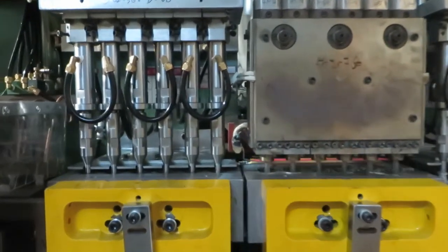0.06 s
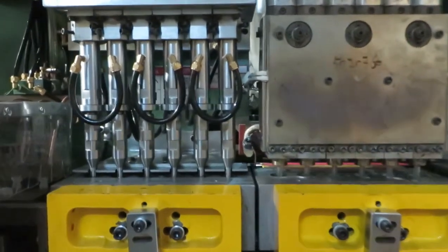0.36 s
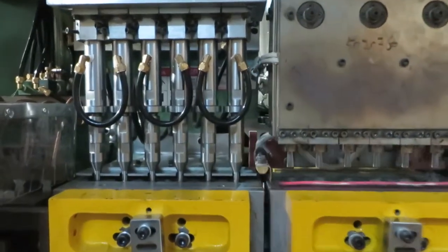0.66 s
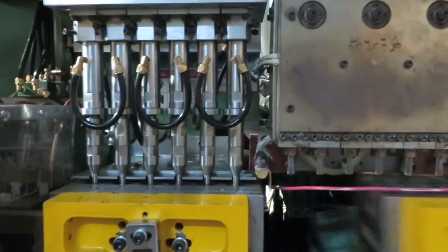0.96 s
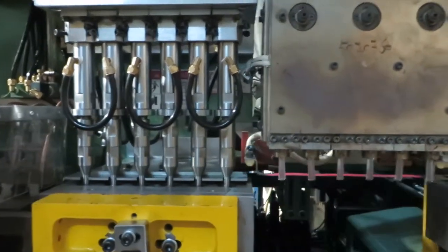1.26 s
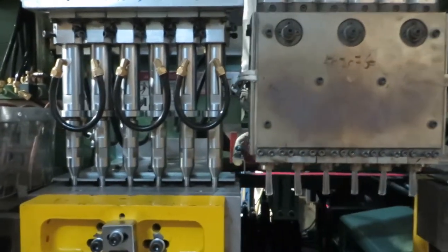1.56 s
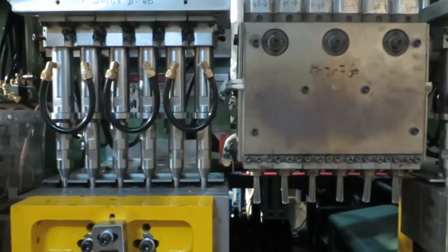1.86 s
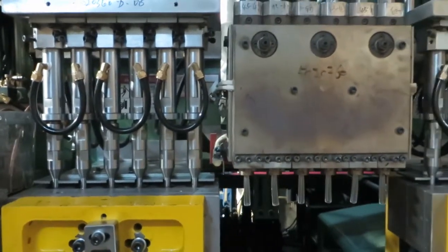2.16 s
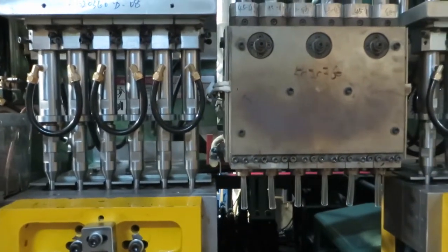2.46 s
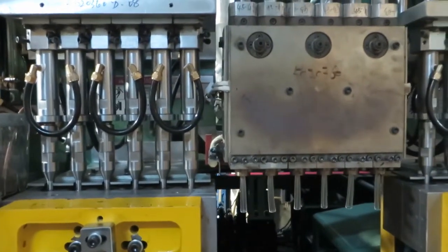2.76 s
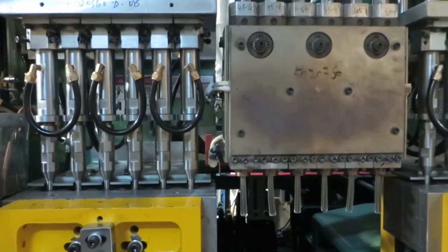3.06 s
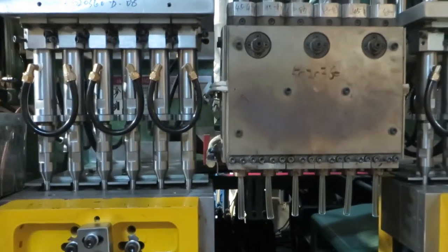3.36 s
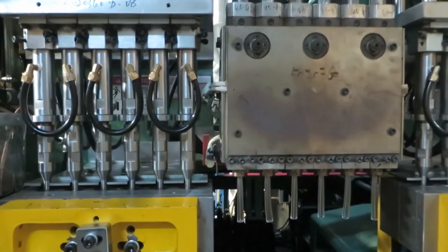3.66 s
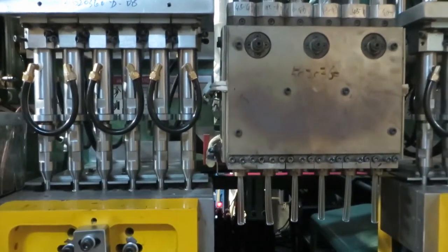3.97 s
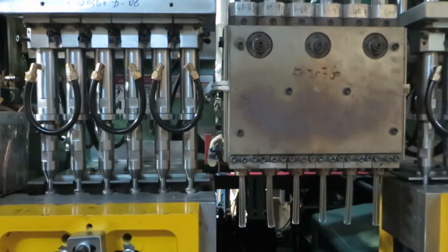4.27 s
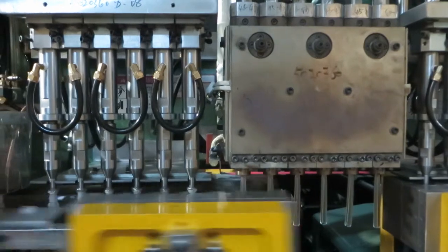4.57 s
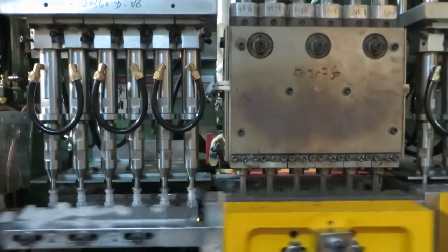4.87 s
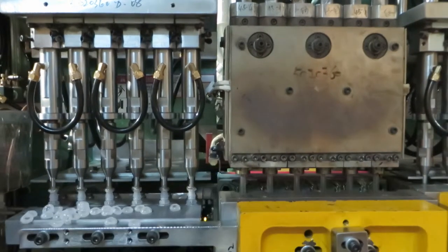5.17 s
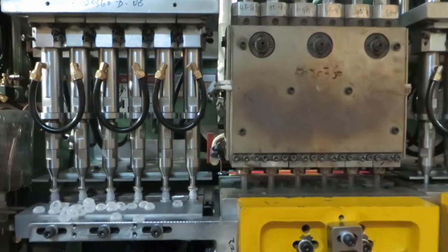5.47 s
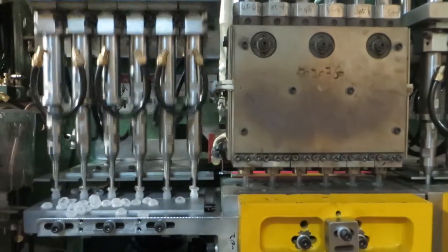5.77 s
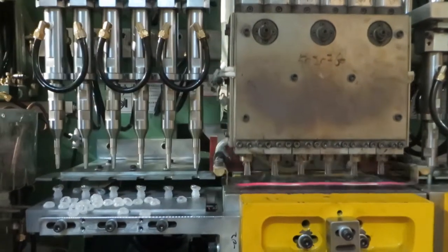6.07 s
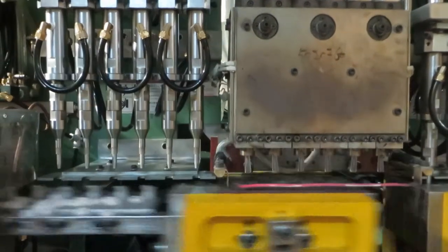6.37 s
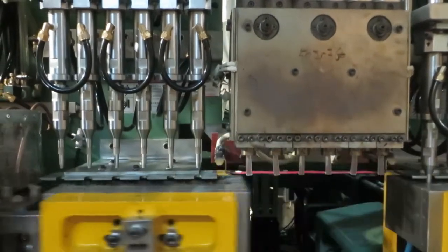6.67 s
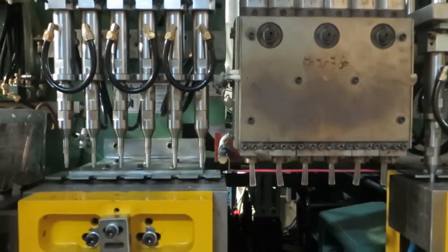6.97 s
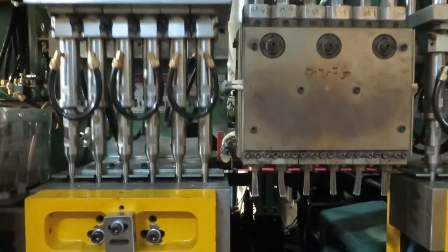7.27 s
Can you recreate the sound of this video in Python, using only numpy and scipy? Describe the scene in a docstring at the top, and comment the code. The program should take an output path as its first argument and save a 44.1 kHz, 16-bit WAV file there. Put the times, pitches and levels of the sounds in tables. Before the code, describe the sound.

An industrial moulding machine hisses steadily with air and oil, with valve puffs, clunks, a thin whistle and one ringing clang.

```python
"""Plastic blow moulding machine

One cycle, heard from close by in a factory. Air hisses through the blow pins into the moulds and
oil rushes through the pipes. On the left, a leak hisses and whistles as the air line fills.
Valves puff and squeal, the mould carriage rumbles, clunks and knocks against its stops,
and two quick blows on the steel frame make one ringing clang."""
import sys
import numpy as np
from scipy import signal
from scipy.fft import rfft, irfft, next_fast_len
from scipy.io import wavfile

SR = 44100
rng = np.random.default_rng(int(sys.argv[2]) if len(sys.argv) > 2 else 0)


def file_out(sig):
    """Save sig as 16-bit WAV at sys.argv[1]."""
    # one column per channel
    cols = np.atleast_2d(sig).T
    # limit, then scale
    lim = np.clip(cols, -1, 1)
    pcm = np.round(lim * 32767).astype(np.int16)
    wavfile.write(sys.argv[1], SR, pcm)


N = 327663
T = np.arange(N) / SR
FFT_SIZE = next_fast_len(N, real=True)
HZ = np.maximum(np.arange(FFT_SIZE // 2 + 1) * SR / FFT_SIZE, 1)

# Below, t is the start time, f is frequency, and t60 is the time a sound takes to fade by 60 dB.
# hiss of air blown into the moulds: f/Hz, level/dB
BLOW_SPECTRUM = [(2000, -104), (4500, -74.5), (5900, -64.5), (7200, -69), (8000, -64.5), (9000, -57.5),
                 (9800, -54), (10700, -53), (11700, -57.5), (12200, -54), (12900, -70), (14200, -77)]
# resonances (boosted or weakened pitches) of the blow pins: f/Hz, width/Hz, boost/dB
PIN_PEAKS = [(6230, 69, 9), (8620, 240, 5.5), (9100, 240, -9.5), (9340, 110, 4.5), (10150, 200, -1),
             (10800, 82, -6), (11900, 220, 0.5), (12300, 170, -1), (12770, 120, 7)]
# spells of blowing: t/s, level/dB, hold/s, left minus right/dB
BLOW_SPELLS = [(0, 1.97, 1.58, -2.7), (1.85, 0, 1.11, -1)]
# rush of oil in valves and pipes: f/Hz, level/dB
OIL_SPECTRUM = [(25, -110), (100, -90.5), (160, -87), (300, -84.5), (600, -77), (1000, -72.5), (1400, -71),
                (2000, -66.5), (2900, -62), (4000, -66.5), (5000, -68), (6000, -65.5), (7300, -72.5),
                (13000, -73)]
# resonances of the main oil line: f/Hz, width/Hz, boost/dB
MAIN_PEAKS = [(605.5, 10.4, 14.5), (1036, 67, 2), (1708, 99, 8), (1900, 92, -1), (2091, 70, 10),
              (2274, 33, 9.5), (2410, 110, 0.5), (2708, 54, 8.5), (2860, 63, 3.5), (3460, 130, 5),
              (4230, 160, 6)]
# resonances of the return oil line: f/Hz, width/Hz, boost/dB
RETURN_PEAKS = [(579, 9.9, 18.5), (1030, 81, 12.5), (1292, 26, 10), (1602, 89, 9.5), (1926, 68, 5),
                (2600, 76, 4.5), (2870, 180, -2.5), (3293, 220, 7.5), (3646, 61, 8), (3840, 140, 4.5),
                (4345, 110, 13), (4770, 150, -1), (5300, 120, 8.5)]
# strokes fed by the main line: t/s, flow/dB, rise/s, hold/s, t60/s
OIL_STROKES = [(0, 0.74, 0.0033, 1.01, 12), (1.2, -1.07, 0.088, 2.5, 5), (5.9, 4.5, 0.73, .58, 1.8)]
# oil draining through the return line: t/s, flow/dB, rise/s, hold/s, t60/s
OIL_DRAINS = [(2.6, 0.64, 2.49, 1.4, 2.6)]
# hiss of air let out by the valves: f/Hz, level/dB
EXHAUST_SPECTRUM = [(150, -89), (600, -65), (2000, -62.5), (4200, -57.5), (5400, -53), (6800, -55.5),
                    (8600, -51.5), (10000, -55), (11600, -59.5), (12800, -67.5), (14200, -69)]
# puffs from the valves: t/s, level/dB, rise/s, hold/s, t60/s, treble tilt/(dB per octave)
PUFFS = [(1.594, 2, 0.025, 0.037, 1, 0), (1.697, -14, .02, 0.11, 0.12, 1),
         (2.967, -5, .006, 0.022, 0.086, -3), (3.054, -12, .012, .025, 0.2, 7),
         (3.272, -16, .01, .03, .15, 11.5), (3.408, -8, .005, .006, 0.068, 7),
         (5.344, -7.5, 0.013, .015, 0.35, 10), (7.173, 1, 0.028, 0.036, 0.77, 1)]
# hiss of the leaking air line: f/Hz, level/dB
LEAK_SPECTRUM = [(200, -99), (700, -72.5), (1400, -78), (2400, -81), (4000, -64.5), (5300, -65.5),
                 (6250, -57), (6900, -66.5), (8400, -61), (10000, -62), (11900, -66.5), (12700, -97),
                 (14200, -124)]
# resonances of the leak: f/Hz, width/Hz, boost/dB
LEAK_RESONANCES = [(5040, 25, 3), (5290, 130, 4.5), (6060, 240, 4), (8520, 280, 3.5), (9100, 140, -3.5),
                   (9400, 150, 2.5), (11400, 1500, 2)]
# cylinders drawing air from the line: t/s, drop in whistle pitch/Hz, recovery/s
AIR_DRAWS = [(1.95, 450, .2), (3.1, 450, .3), (3.38, 250, .1), (6.045, 700, .15), (6.4, 150, .35)]
# blows on the steel frame: t/s, level/dB
FRAME_HITS = [(4.469, -7.5), (4.49, -11.5)]
# modes (natural ringing tones) of the frame: f/Hz, level/dB, t60/s
FRAME_MODES = [(790, -6, .25), (905, -7, .25), (1160, -5, .3), (1290, -3, .85), (1363, 0, .5),
               (1417, -6, .4), (1945, -3, .65), (1990, -5, .6), (2380, 0, .6), (2489, -4, .5),
               (2730, -5, .6), (2817, 2, .45), (2900, -4, .5), (2995, -2, .7), (3248, -9, .5),
               (3420, -6, .35), (3606, -3, .85), (3800, -5, .45), (4306, -5, .55), (4660, -8, .3),
               (5314, -10, .65)]
# hard knocks on the stops: t/s, level/dB, most strongly excited f/Hz
STOP_HITS = [(.2643, -5.5, 1580), (5.7621, -3, 910)]
# modes of the stops: f/Hz, level/dB, t60/s
STOP_TONES = [(367, -4, 0.11), (544, -17, .06), (722, -1.5, 0.065), (967, -0.5, 0.026), (1050, -5, 0.035),
              (1420, -12.5, 0.05), (1534, -2.5, 0.027), (2370, -8, .04), (2940, 0.5, 0.037)]
# clunks and thuds, and the low thump of a puff of air (at 1.665 s):
# t/s, level/dB, rise/s, t60/s, low f/Hz, high f/Hz
THUDS = [(0.266, -25.5, 0.0037, 0.11, 330, 3200), (.275, -34, .004, .2, 350, 400),
         (0.499, -36.5, 0.0071, 0.43, 155, 816), (1.665, -30, 0.027, 0.13, 260, 1320),
         (1.858, -34, 0.0028, 0.018, 140, 1320), (1.989, -52, 0.0081, 0.22, 140, 400),
         (2.971, -30, 0.0066, 0.2, 250, 510), (3.065, -27.5, 0.0076, 0.21, 400, 1020),
         (3.109, -19, 0.012, 0.14, 570, 3370), (3.19, -31, .012, .26, 200, 1800),
         (3.409, -15.5, 0.0067, 0.13, 586, 3600), (3.425, -26, 0.018, 0.32, 218, 1880),
         (5.346, -42.5, 0.0084, 0.37, 130, 357), (5.764, -16.5, 0.0019, 0.16, 486, 3000),
         (6.015, -28.5, 0.013, 0.41, 144, 1000), (6.91, -18, 0.019, 0.29, 380, 2050),
         (6.94, -24, 0.024, .6, 630, 1020)]
# squealing valves: t/s, length/s, start f/Hz, end f/Hz, width/Hz, level/dB
VALVE_SQUEALS = [(1.741, 0.047, 3700, 3330, 1360, -20.5), (1.851, 0.012, 9400, 10300, 1740, -13.5),
                 (2.79, 0.044, 10400, 10900, 1210, -23), (3.69, 0.25, 2860, 2850, 70, -31.5),
                 (5.961, 0.52, 1813, 1620, 200, -31.5), (6.5, 0.56, 2830, 2815, 109, -26.5),
                 (7.188, 0.031, 5300, 5100, 604, -15.5), (7.189, 0.094, 11700, 11400, 505, -20),
                 (7.284, 0.095, 7900, 7000, 1100, -22), (7.379, 0.021, 9800, 10800, 1620, -18)]
# rumble of the sliding carriage: f/Hz, level/dB
SLIDE_SPECTRUM = [(30, -102), (90, -95), (160, -84), (260, -81), (420, -74), (800, -71), (1400, -71),
                  (3000, -86)]
# moves of the carriage and moulds: t/s, level/dB, rise/s, hold/s, t60/s
CARRIAGE_MOVES = [(.1, 0, 0.12, .08, 3.4), (1.33, .5, 0.067, 0.17, 1.4), (2.95, 6, 0.19, .02, 2),
                  (3.7, .8, 0.68, 2, 4.5), (4.69, 11.5, 0.076, .02, 1.2), (6.88, 11, .14, 0.25, .5)]
# brief dips in the noise after the loudest events: t/s, depth/dB
LEVEL_DIPS = [(1.875, 7), (4.53, 3.5), (5.79, 4), (7.41, 3)]
# sound from ahead at the two microphones: f/Hz, likeness (0-1), phase/rad, left minus right/dB
STEREO_AHEAD = [(3900, 1, 0, 0.5), (5400, 0.55, 0.7, 0), (7650, 0.4, 1, 1), (8800, 0.8, 1.5, -1.5),
                (10000, 0.8, 2.5, -2.5), (11800, 0.88, 2, 4), (13100, 0.8, 3, 1.5)]
# sound from the left: same columns
STEREO_LEFT = [(3500, 0.93, -0.5, 5), (5200, .8, 0.5, 3.5), (6240, 1, -3.1, 4.5), (7500, 0.2, 1, 7),
               (8850, 0.5, -1.5, 5), (10900, 0.8, -3.5, 7), (13200, 0, 0.3, 2.5), (12600, 0, 19, 4)]
# a blast of air flowing over the microphones: same columns
STEREO_BLAST = [(120, .98, 0, 0), (500, 0.97, 0.26, 0), (1300, 1, 0.28, 0), (5000, 0.64, 0, 0),
                (9000, 0.097, 1, 0)]

# the air line starts to fill when blowing stops, and is emptied (vented) near the end
FILL_START_S, FILL_TIME_S, VENT_S = 2.97, 1.52, 7.15


def blowing(rise_s=0.0067, t60=0.34, flutter_db=0.5):
    """Air hisses through the blow pins while their valve is open."""
    valve = 0
    for start, db, hold, pan_db in BLOW_SPELLS:
        sides_db = db + np.array([[pan_db], [-pan_db]]) / 2
        valve = valve + undb(sides_db) * burst(T - start, rise_s, t60, hold)
    hiss = turbulence(colour(BLOW_SPECTRUM, PIN_PEAKS), STEREO_AHEAD)
    return hiss * valve * undb(flutter_db * wander(34.86))


def hydraulics(flutter_db=0.72, brighten=0.6, throttle_hz=2600, throttle_width_hz=1800):
    """Rushing oil rings each pipe; at high flow the hiss of the throttle valve grows fastest."""
    throttle = 1 / (1 + (2 * (HZ - throttle_hz) / throttle_width_hz) ** 4)
    out = 0
    for runs, peaks, idle_db in ((OIL_STROKES, MAIN_PEAKS, -22), (OIL_DRAINS, RETURN_PEAKS, -18)):
        gain = colour(OIL_SPECTRUM, peaks)
        flow = np.maximum(motion(runs), undb(idle_db))
        for share, growth in ((1 - throttle, 0), (throttle, brighten)):
            level = flow * np.maximum(flow, 1) ** growth * undb(flutter_db * wander(25))
            out = out + turbulence(gain * np.sqrt(share), STEREO_AHEAD) * level
    return out


def exhausts(sputter_db=1.0, tilt_pivot_hz=6000):
    """Each valve lets out a sputtering puff of air."""
    air = turbulence(colour(EXHAUST_SPECTRUM, ripple_hz=164.0), STEREO_BLAST)
    air *= undb(sputter_db * wander(90))
    out, t = np.zeros((2, N)), T[:SR]
    octaves = np.log2(np.maximum(np.arange(SR // 2 + 1), 500) / tilt_pivot_hz)  # flat below 500 Hz
    for start, db, rise, hold, t60, tilt_db in PUFFS:
        one_second = np.take(air, int(start * SR) + np.arange(SR), axis=1, mode="wrap")
        puff = one_second * burst(t, rise, t60, hold)
        add(out, start, irfft(rfft(puff) * undb(db + tilt_db * octaves)))
    return out


def leak(low_db=-7.5, full_db=2.5, flutter_db=0.5, rise_s=0.041, t60=1.6):
    """A leak hisses harder as the air line fills, and dies away when it is vented."""
    db = low_db + (full_db - low_db) * line_fullness() + flutter_db * wander(30)
    pressurised = burst(T - FILL_START_S, rise_s, t60, hold=VENT_S - FILL_START_S - rise_s)
    return turbulence(colour(LEAK_SPECTRUM, LEAK_RESONANCES), STEREO_LEFT) * undb(db) * pressurised


def clang(ring_db=-13.3, crash_db=-5.3, tail_db=-16, beating=0.87, cluster_hz=45):
    """Steel hits steel twice: a noisy crash, then close tones that beat (throb) as they ring on."""
    out, t = np.zeros(N), T[:SR]
    for start, db in FRAME_HITS:
        ring = 0
        for hz, mode_db, t60 in FRAME_MODES:
            tone = np.sin(2 * np.pi * (hz * t + rng.random()))
            neighbours = beating * unsteady_tone(np.full(SR, hz), cluster_hz)
            ring = ring + undb(mode_db) * (tone + neighbours) * burst(t, 0.0062, t60)
        envelope = burst(t, rise=0.0036, t60=0.17) + undb(tail_db) * burst(t, rise=0.077, t60=1.0)
        crash = band(rng.standard_normal(SR), low_hz=800, high_hz=3800) * envelope
        add(out, start, undb(db) * (undb(ring_db) * ring / np.sqrt(2) + undb(crash_db) * crash))
    return out


def knocks(contact_s=0.0015, bounce_s=0.0073, bounce_db=-13, spread_octaves=0.27):
    """A hard hit briefly rings a stop, mostly near one pitch, and bounces once."""
    out, t = np.zeros(N), T[:SR // 4]
    for start, db, centre_hz in STOP_HITS:
        ring = 0
        for hz, mode_db, t60 in STOP_TONES:
            strength = undb(db + mode_db) / np.hypot(1, np.log2(hz / centre_hz) / spread_octaves)
            ring = ring - strength * np.sin(2 * np.pi * hz * t) * burst(t, contact_s, t60)
        add(out, start, ring)
        add(out, start + bounce_s, undb(bounce_db) * ring)
    return out


def thuds(roughness_db=1.0, hall_db=-24, hall_t60=0.97):
    """Clunks and thuds, and the low thump of a puff of air: rough noise with a faint hall echo."""
    out, t = np.zeros(N), T[:SR]
    for start, db, rise, t60, low_hz, high_hz in THUDS:
        noise = rng.standard_normal(SR) * undb(roughness_db * wander(347, SR))
        envelope = burst(t, rise, t60, hold=rise) + undb(hall_db) * burst(t, 0.056, hall_t60)
        add(out, start, undb(db) * band(noise, low_hz, high_hz) * envelope)
    return out


def squeals(stereo_above_hz=4500):
    """Valves sing as air or oil squeezes through; high squeals differ between left and right."""
    out, t = np.zeros((2, N)), T[:SR]
    for start, length, start_hz, end_hz, width_hz, db in VALVE_SQUEALS:
        hz = np.interp(t, [0, length], [start_hz, end_hz])
        swell = np.sqrt(np.abs(np.sin(np.pi * np.minimum(t / length, 1))))
        left = unsteady_tone(hz, width_hz)
        right = unsteady_tone(hz, width_hz) if start_hz > stereo_above_hz else left
        add(out, start, undb(db) * swell * np.array([left, right]))
    return out


def whistle_pitch(rest_hz=6370, blowing_drop_hz=770, waver_hz=15, onset_s=0.05):
    """The leak's pitch is low during blowing, and drops at each draw of air before climbing back."""
    hz = rest_hz - blowing_drop_hz * (T < FILL_START_S) + waver_hz * wander(20)
    for start, drop_hz, recovery in AIR_DRAWS:
        onset = np.clip(1 + (T - start) / onset_s, 0, 1)
        hz = hz - drop_hz * onset * np.exp(-np.maximum(T - start, 0) / recovery)
    return hz


def whistle(start_s=1.8, rise_s=0.28, low_db=-34.5, full_db=-26.5, fade_at_s=6.3, pan_db=7):
    """The leak whistles louder as the line fills, then weakens during the last stroke."""
    hz = whistle_pitch()
    direct = unsteady_tone(hz, width_hz=120)
    reflected = 0.25 * unsteady_tone(hz, width_hz=120)
    left = (direct + reflected) * undb(pan_db / 2)
    right = (direct - reflected) * undb(-pan_db / 2)
    envelope = burst(T - start_s, rise_s, t60=0.39, hold=VENT_S - start_s - rise_s)
    db = low_db + (full_db - low_db) * np.sqrt(line_fullness())
    db -= 4.5 * np.maximum(T - fade_at_s, 0)  # 4.5 dB quieter each second
    return np.array([left, right]) / np.sqrt(2) * envelope * undb(db)


def carriage(idle_db=-9.5, judder_db=2.0):
    """The carriage shudders along its guides, which rumble softly between moves."""
    speed = np.maximum(motion(CARRIAGE_MOVES), undb(idle_db))
    rumble = turbulence(colour(SLIDE_SPECTRUM, ripple_hz=25.03), STEREO_AHEAD)
    return rumble * speed * undb(judder_db * wander(22))


def dips(onset_s=0.027, recovery_db_per_s=21):
    """A gain that sinks quickly at each dip and comes back at a steady rate."""
    db = 0
    for start, depth_db in LEVEL_DIPS:
        onset = np.clip(1 + (T - start) / onset_s, 0, 1)
        db = db - onset * np.clip(depth_db - recovery_db_per_s * (T - start), 0, depth_db)
    return undb(db)


def line_fullness():
    """How full the air line is, from 0 to 1: it fills fast at first, then ever more slowly."""
    return 1 - np.exp(-np.maximum(T - FILL_START_S, 0) / FILL_TIME_S)


def motion(runs):
    """Gain of a part that speeds up, runs and coasts to rest, once for each row."""
    gains = [undb(db) * burst(T - start, rise, t60, hold) for start, db, rise, hold, t60 in runs]
    return np.max(gains, axis=0)


def turbulence(gain, stereo):
    """Stereo noise of a swirling flow, shaped by gain: alike in the bass, parting in the treble."""
    likeness, phase, pan_db = over_hz(stereo)
    parted = np.clip((HZ - stereo[0][0]) / 500, 0, 1)  # sides part over 500 Hz above the first row
    likeness = 1 - parted * (1 - np.clip(likeness, 0, 1))
    phase, pan_db = parted * phase, parted * pan_db
    left, unrelated = rfft(rng.standard_normal((2, FFT_SIZE))) * gain * np.sqrt(SR / 2)
    right = likeness * np.exp(-1j * phase) * left + np.sqrt(1 - likeness ** 2) * unrelated
    return irfft(np.array([left * undb(pan_db / 2), right * undb(-pan_db / 2)]), FFT_SIZE)[:, :N]


def colour(spectrum, peaks=(), ripple_hz=45, ripple_db=1.6):
    """Gain at each frequency: a smooth shape, resonances, and ripples from nearby steel surfaces."""
    ripple = ripple_db * np.interp(HZ / ripple_hz, np.arange(1024), rng.standard_normal(1024))
    db = over_hz(spectrum)[0] + ripple
    for hz, width, boost_db in peaks:
        db = db + boost_db / (1 + (2 * (HZ - hz) / width) ** 2)
    return undb(db)


def over_hz(rows):
    """Fill in a table's columns at every frequency in HZ."""
    hz, *columns = np.transpose(rows)
    return [np.interp(np.log(HZ), np.log(hz), column) for column in columns]


def unsteady_tone(hz, width_hz):
    """A narrow band of noise that follows a pitch, with an average (rms) level of 1."""
    lowpass = signal.butter(2, width_hz / 2, fs=SR, output="sos")
    sway = signal.sosfilt(lowpass, rng.standard_normal((2, len(hz))))
    phase = 2 * np.pi * np.cumsum(hz) / SR
    return (sway[0] * np.cos(phase) + sway[1] * np.sin(phase)) / sway.std()


def band(sound, low_hz, high_hz):
    """Keep what lies between two frequencies, at an average (rms) level of 1."""
    edges = [low_hz, np.clip(high_hz, low_hz + 20, SR / 2 - 20)]
    kept = signal.sosfilt(signal.butter(3, edges, "band", fs=SR, output="sos"), sound)
    return kept / kept.std()


def wander(rate, count=N):
    """A random drift of size about 1 that turns about rate times a second."""
    points = rng.standard_normal(16384)
    return 1.3 * np.interp(np.arange(count) * rate / SR, np.arange(len(points)), points)


def burst(t, rise, t60, hold=0):
    """A loudness curve that rises, holds and dies away; times in seconds."""
    return np.clip(t / rise, 0, 1) * np.exp(-np.log(1000) * np.maximum(t - rise - hold, 0) / t60)


def add(out, start_s, sound):
    """Mix a sound into out at its start time."""
    i = int(start_s * SR)
    out[..., i:i + sound.shape[-1]] += sound[..., :N - i]


def undb(db):
    """Turn decibels into a gain, a number to multiply by."""
    return 10 ** (np.asarray(db) / 20)


def scene():
    """Air, oil and the sliding carriage, with the squeals, thuds and hits of the cycle on top."""
    rush = hydraulics() + blowing() + leak() + whistle() + carriage() + exhausts()
    return rush * dips() + squeals() + thuds() + knocks() + clang()


def record(dry, bass_hz=45, top_hz=13200):
    """Clip peaks at full scale, thin the deep bass and cut the highest treble."""
    bass_cut = signal.butter(1, bass_hz, "high", fs=SR, output="sos")
    top_cut = signal.ellip(10, 0.2, 80, top_hz, fs=SR, output="sos")
    return signal.sosfilt(top_cut, signal.sosfilt(bass_cut, np.clip(dry, -1, 1)))


dry = scene()
out = record(dry)
file_out(out)
```